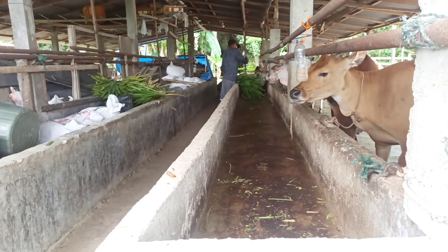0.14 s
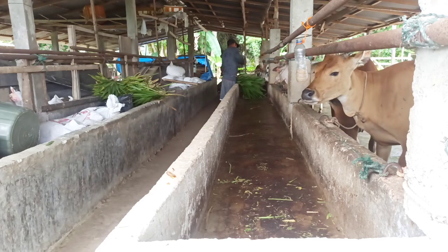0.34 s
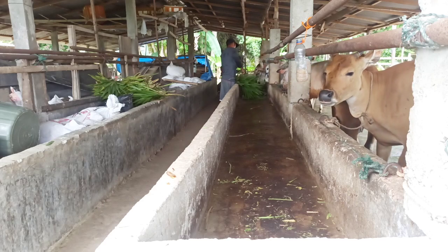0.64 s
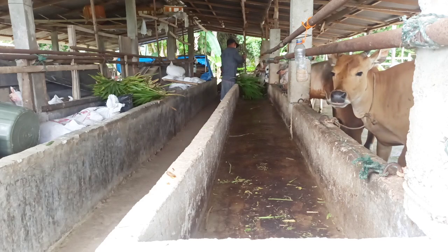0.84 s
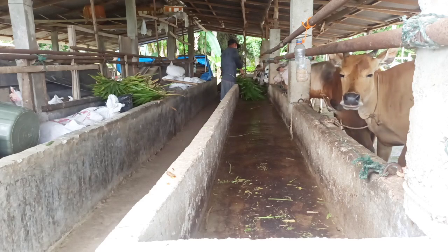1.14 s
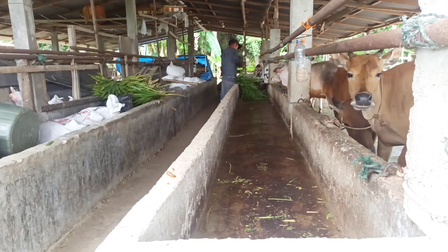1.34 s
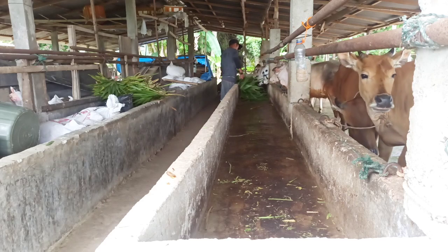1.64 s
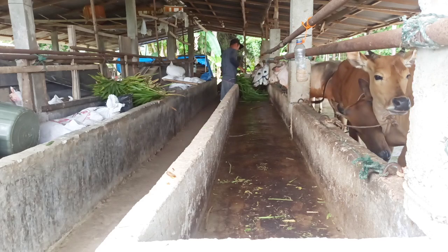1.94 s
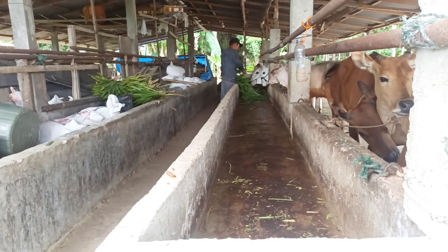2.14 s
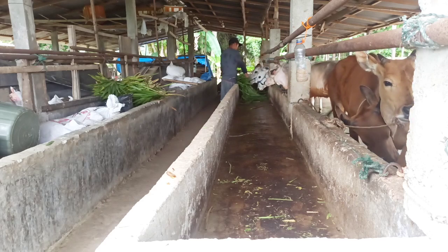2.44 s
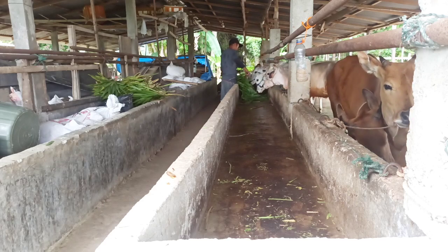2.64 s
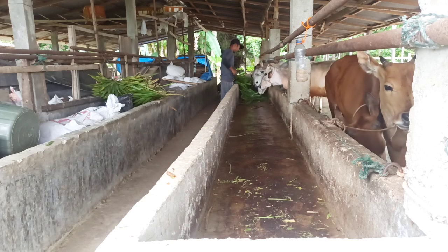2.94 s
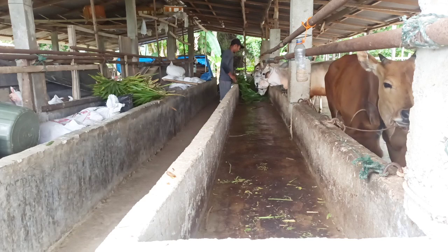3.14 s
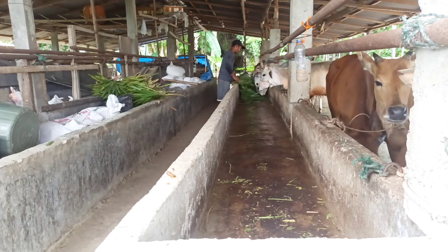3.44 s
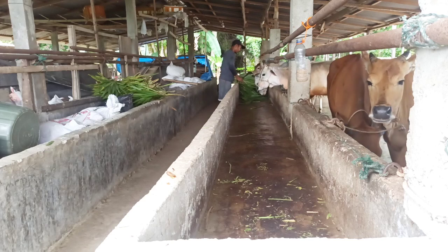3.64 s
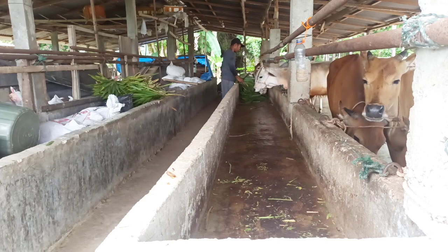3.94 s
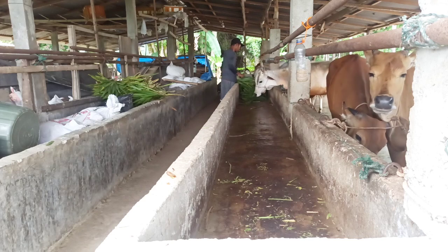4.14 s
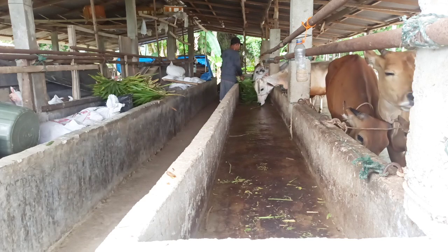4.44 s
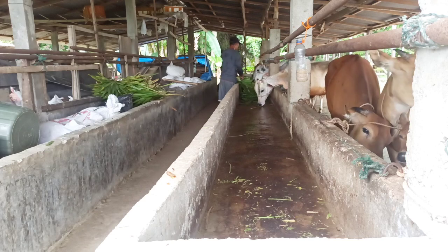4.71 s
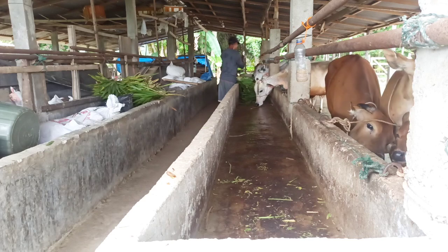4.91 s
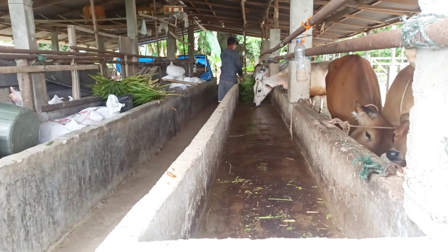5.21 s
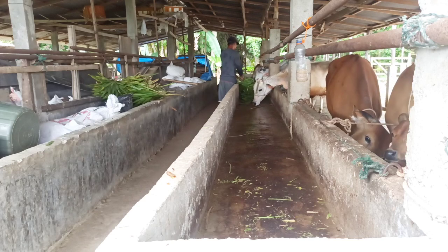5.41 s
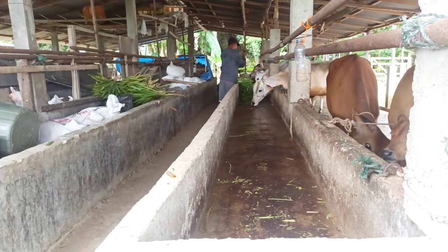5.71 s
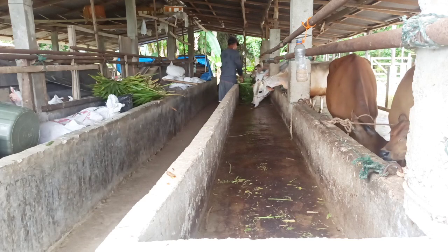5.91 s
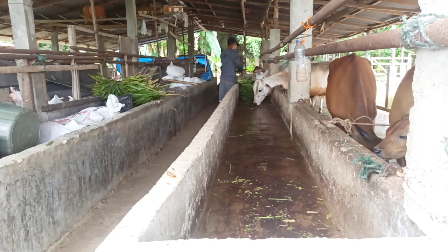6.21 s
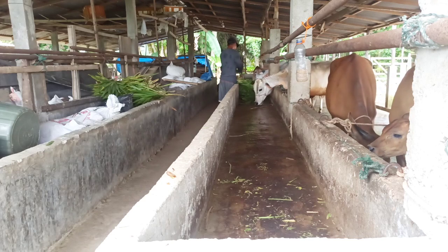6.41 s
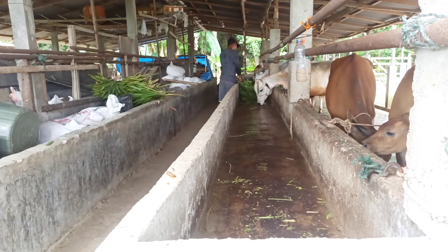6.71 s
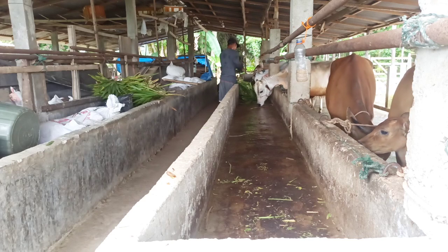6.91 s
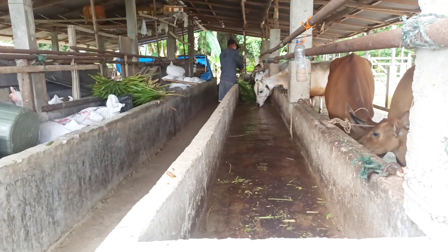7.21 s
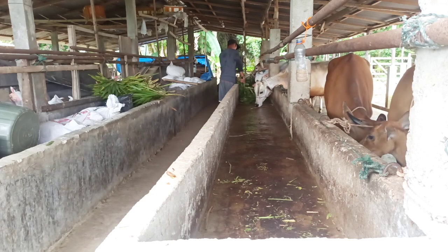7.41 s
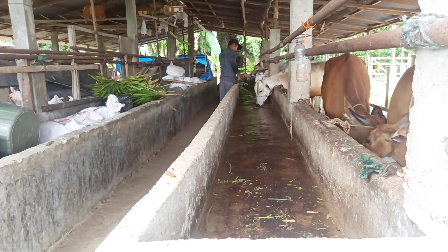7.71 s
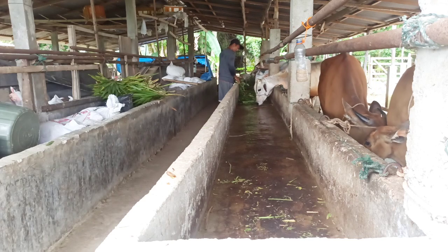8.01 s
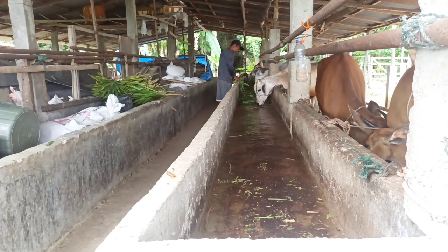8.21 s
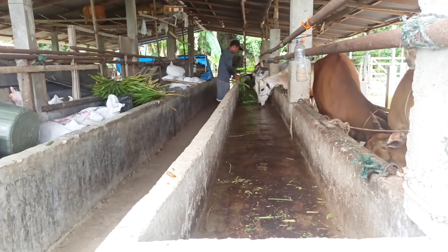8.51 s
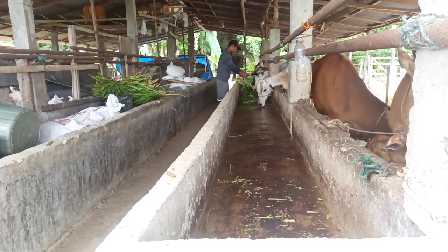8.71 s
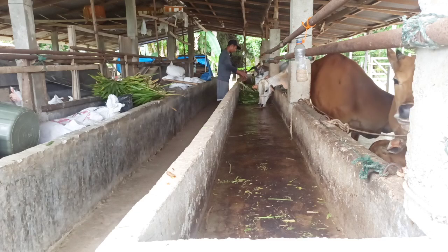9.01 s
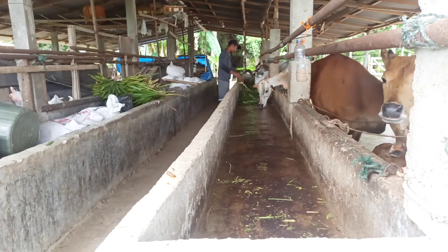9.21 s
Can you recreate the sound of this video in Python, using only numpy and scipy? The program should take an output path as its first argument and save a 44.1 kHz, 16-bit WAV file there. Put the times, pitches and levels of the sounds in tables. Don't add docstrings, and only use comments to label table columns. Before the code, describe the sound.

Eight blade blows chop fodder stalks on a wooden block under a tin barn roof, with rustling leaves, cicadas, bird whistles and distant engine thud.

```python
import sys
import numpy as np
from scipy import signal
from scipy.fft import rfft, irfft, next_fast_len
from scipy.io import wavfile
from scipy.ndimage import uniform_filter1d, map_coordinates

SR = 44100
rng = np.random.default_rng(int(sys.argv[2]) if len(sys.argv) > 2 else 0)


def pcm_store(signal):
    levels = np.round(np.clip(np.atleast_2d(signal), -1, 1) * 32767)
    wavfile.write(sys.argv[1], SR, levels.astype(np.int16).T)


def magnitude_from_level(level_db):
    exponent = np.asarray(level_db, float) / 20
    return 10 ** exponent


N = 412335


def unit(x):
    return x / np.sqrt(np.mean(x ** 2) + 1e-20)


def along(points, hz):
    f, v = np.transpose(points)
    return np.interp(np.log(hz + 1), np.log(f + 1), v)


def curves(rows):
    s, *cols = np.transpose(rows)
    return [np.interp(np.arange(N) / SR, s, c) for c in cols]


def wobble(rate):
    at = np.arange(0, N + 64, 64)
    knots = rng.standard_normal(int(N * 40 / SR))
    return np.interp(np.arange(N), at, map_coordinates(knots, [at * rate / SR]))


def filtered(x, response):
    m = next_fast_len(x.shape[-1] + 8192)
    shaped = rfft(x, m) * response(np.fft.rfftfreq(m, 1 / SR))
    return irfft(shaped, m)[..., :x.shape[-1]]


def modes(table):
    def response(f):
        total = 0
        for k, (centre, width, db) in enumerate(table):
            damping = 1j * f * width
            total = total + (-1) ** k * magnitude_from_level(db) * damping / (centre ** 2 - f ** 2 + damping)
        return total
    return response


def add(out, s, x):
    part = out[:, round(s * SR):][:, :x.shape[1]]
    part += x[:, :part.shape[1]]


# frequency [Hz], left-right likeness [-1 to 1].
LIKENESS = [(40, .98), (125, .93), (300, .82), (700, .62), (1500, .3), (3000, .15), (6000, .08),
            (9000, -.15), (14000, -.05)]


def spread(pair):
    def mid_side(hz):
        turn = np.arccos(np.clip(along(LIKENESS, hz), -1, 1)) / 2
        return np.array([np.cos(turn), np.sin(turn)])
    mid, side = filtered(pair, mid_side)
    return np.array([mid + side, mid - side])


# frequency [Hz], time to fall 60 dB [s].
ROOF_RING = [(200, 0.62), (800, 0.45), (2000, 0.33), (6000, 0.39), (15000, 0.5)]


def roof(x, wet_db):
    hz, t, z = signal.stft(spread(rng.standard_normal((2, SR // 3))), SR, nperseg=256)
    fade = magnitude_from_level(-60 * t / along(ROOF_RING, hz)[:, None])
    tail = signal.istft(z * fade, SR, nperseg=256)[1]
    return magnitude_from_level(wet_db) * signal.fftconvolve(x[None], tail / np.linalg.norm(tail[0]), axes=1)


# start [s], thud level [dB], thud pitch [Hz], splinter level [dB], tearing length [s].
CHOPS = [
    (0.489, -13, 940, -14, 0.065),
    (1.096, -12.5, 605, -11, 0.066),
    (1.629, -17, 550, -10.5, 0.065),
    (2.426, -15, 263, -13.5, 0.12),
    (5.234, -12, 990, -12.5, 0.077),
    (5.919, -14.5, 420, -12, 0.084),
    (6.563, -15, 300, -11, 0.04),
    (7.324, -19, 500, -9.5, 0.036),
]
# frequency [Hz], level [dB].
BLOCK_COLOUR = [(100, -42), (200, -2), (500, -2.5), (1000, -1.5), (1500, -5.5), (3000, -17)]
# frequency [Hz], level [dB].
STALK_COLOUR = [(300, -47), (1000, -7.5), (2100, -1.5), (3000, -6), (4300, -2), (7000, 1), (12000, -7.5),
                (16000, -8.5)]


def chops():
    out, t = np.zeros((2, N)), np.arange(SR // 6) / SR
    rise = 1 - np.exp(-t / .002)
    cut = rise / (1 + (t / .015) ** 6)
    for s, thud_db, thud_hz, splinter_db, length in CHOPS:
        lumps = magnitude_from_level(5.4 * unit(uniform_filter1d(rng.standard_normal(len(t)), size=130)))
        tear_fade = magnitude_from_level(-60 * t / 1.6) / (1 + (t / length) ** 4)
        tear = magnitude_from_level(-7) * rise * unit(lumps) * tear_fade
        snaps = rng.standard_normal((3, len(t))) * magnitude_from_level(3.7 * rng.standard_normal(len(t)))
        knock = modes([(thud_hz, .6 * thud_hz, 0)])
        wood = filtered(snaps[0], lambda hz: magnitude_from_level(along(BLOCK_COLOUR, hz)) * (1.0 + np.abs(knock(hz))))
        thud = magnitude_from_level(thud_db) * unit(wood)
        fibres = filtered(snaps[1:], lambda hz: magnitude_from_level(along(STALK_COLOUR, hz)))
        splinters = magnitude_from_level(splinter_db) * unit(spread(fibres))
        add(out, s, (cut + 0.77 * tear) * thud + (cut + tear) * splinters)
        add(out, s + .005, roof((cut + 0.77 * tear) * (0.4 * thud + splinters[0]), wet_db=3.0))
    return out


# start [s], peak level [dB], pitch [Hz].
TICKS = [(0.258, -29, 890), (1.565, -27.5, 1110), (3.625, -28, 1120), (4.259, -18, 2130),
         (4.287, -21, 1120), (4.322, -21, 1170), (4.507, -16.5, 1400), (4.58, -21, 1700),
         (4.635, -21, 1500), (4.26, -23, 1150), (6.138, -35, 840), (6.899, -22, 1130), (7.484, -16, 2600),
         (7.678, -24, 1600), (7.735, -17.5, 1970), (7.825, -15.5, 790), (7.836, -12.5, 2370),
         (8.035, -33, 885), (8.363, -24, 900), (9.031, -16, 800), (9.079, -17.5, 1790)]
# start [s], peak level [dB], pitch [Hz].
HOOVES = [
    (2.774, -26, 330),
    (4.364, -25, 397),
    (5.245, -15, 110),
    (7.743, -18.5, 240),
    (9.053, -14, 221),
    (9.286, -19.5, 250),
]
# start [s], peak level [dB], pitch [Hz].
STRAWS = [
    (6.228, -20, 6600),
    (9.313, -14, 6200),
]


def ticks():
    out, t = np.zeros((2, N)), np.arange(SR // 20) / SR
    for s, db, hz in TICKS + HOOVES + STRAWS:
        puff = rng.standard_normal(len(t)) * magnitude_from_level(-60 * t / 0.047)
        snap = filtered(puff, modes([(hz, 0.55 * hz, 0)]))
        snap = magnitude_from_level(db + 1.0) * snap / np.abs(snap).max()
        add(out, s, np.array([snap, snap]))
        add(out, s + .005, roof(snap, wet_db=0.5))
    return out


def rush(spectrum, patchy_db):
    z = signal.stft(rng.standard_normal((2, N)), nperseg=512)[2]
    field = uniform_filter1d(rng.standard_normal(z.shape[1:]), size=6, axis=0)
    field = uniform_filter1d(field, size=12, axis=1)
    pair = signal.istft(z * magnitude_from_level(patchy_db * unit(field)), nperseg=512)[1][:, :N]
    return unit(spread(filtered(pair, lambda hz: magnitude_from_level(along(spectrum, hz)))))


def swells(at, peak_db, rise, fall, floor_db):
    t = np.arange(0, N + 64, 64)[:, None] / SR - at
    shape_db = peak_db - 10 * np.maximum(-t / np.abs(rise), t / np.abs(fall))
    power = np.sum(magnitude_from_level(2 * shape_db), axis=1) + magnitude_from_level(2 * floor_db)
    return np.interp(np.arange(N), np.arange(len(t)) * 64, np.sqrt(power))


# peak time [s], peak level [dB], rise [s], fall [s], brightness [dB].
RUSTLES = [(0.0, -32, .1, 0.5, -11), (.52, -26.5, 0.067, 0.13, -11), (.7, -33.5, .1, 0.68, -11.5),
           (1.28, -33, 0.28, 0.32, -8.5), (1.48, -32.5, 0.24, 0.2, -25), (1.9, -31.5, 0.25, 0.23, -6),
           (2.14, -40.5, 0.23, 0.17, -21), (2.44, -27.5, 0.076, .2, -22), (2.6, -31.5, 0.13, 0.77, -12.5),
           (3.13, -36.5, 0.038, 0.41, -3.5), (3.49, -34.5, 0.18, 0.26, -5.5), (3.7, -27, 0.22, 0.37, -11.5),
           (4.05, -36.5, .3, .7, -7.5), (4.51, -27.5, 0.036, 0.1, -9.5), (4.75, -36, 0.72, 0.73, -12.5),
           (5.75, -32, 0.18, 0.24, -13.5), (6.08, -33.5, 0.084, 0.29, -11.5),
           (6.23, -34.5, 0.024, 0.079, -1), (6.77, -36, 1, 0.98, -15.5), (7.5, -30.5, 0.23, 0.5, -11.5),
           (7.86, -34, 0.28, 0.074, -7.5), (8.2, -36.5, .12, 0.38, -6.5), (8.56, -32.5, 0.41, 0.54, -12),
           (9.08, -27.5, 0.26, 0.19, -12.5)]
# frequency [Hz], level [dB].
LEAF_COLOUR = [(100, -34), (300, -8), (700, -1), (1200, -2.5), (2200, -4), (3500, -4), (6000, -3),
               (16000, -17.5)]
# frequency [Hz], level [dB].
AIR_COLOUR = [(6000, -49), (9000, 11), (12000, 0), (16000, -0.5)]


def rustles():
    at, peak_db, rise, fall, bright_db = np.transpose(RUSTLES)
    body = swells(at, peak_db, rise, fall, floor_db=-42)
    leaves = body * magnitude_from_level(3.5 + 0.87 * wobble(12)) * rush(LEAF_COLOUR, patchy_db=2.0)
    top = swells(at, peak_db + bright_db, rise, fall, floor_db=-63)
    return leaves + top * magnitude_from_level(13) * rush(AIR_COLOUR, patchy_db=.5)


# time [s], level [dB].
BREEZE = [(0, -49), (2.0, -45), (2.3, -60), (3.0, -42.5), (4.4, -49), (5.5, -35.5), (6.3, -44), (6.5, -34),
          (7.3, -35), (8.05, -41.5), (8.3, -39), (9.35, -34.5)]
# frequency [Hz], level [dB].
HISS_COLOUR = [(1000, -58), (3000, -12), (5000, 2), (7000, 1), (9000, -4), (12000, -13), (16000, -13)]


def hiss():
    at, peak_db, rise, fall, bright_db = np.transpose(RUSTLES)
    crisp = swells(at, peak_db + 5.5 + 0.58 * bright_db, rise, fall, floor_db=-70)
    level = np.hypot(crisp, magnitude_from_level(curves(BREEZE)[0]))
    return level * magnitude_from_level(6 + 0.6 * wobble(10)) * rush(HISS_COLOUR, patchy_db=2.5)


def duck():
    t, delay, back = np.arange(N) / SR, 0.064, 0.11
    dips = 0
    for s, *_ in CHOPS:
        late = t - s - delay
        dips = dips + np.exp(-(late / np.where(late < 0, delay / 2, back)) ** 2)
    return magnitude_from_level(-5.5 * dips)


# time [s], firings per second.
SPEED = [(0.0, 18.87), (0.6, 17.17), (1.2, 16.6), (1.8, 20.18), (2.6, 19.45), (3.2, 18.07), (3.8, 18.37),
         (5.2, 23.15), (5.4, 22.1), (5.8, 24.3), (6.4, 20.32), (7.2, 22.09), (8.0, 22.5), (8.4, 21.43),
         (9.35, 21.32)]
# time [s], level [dB].
EXHAUST = [(.4, -30), (.7, -44), (.83, -26), (.96, -36), (1.25, -30.5), (1.5, -25), (2.73, -20),
           (2.89, -31.5), (3.04, -35), (3.1, -23), (4.97, -25.5), (5.08, -35.5), (5.5, -25.5), (7.3, -21),
           (7.42, -32.5), (7.94, -17.5), (8.88, -23.5), (8.98, -35)]
# time [s], frequency [Hz].
BOOM = [(0, 133), (1.3, 143), (1.8, 160), (2.2, 162), (2.8, 154), (3.3, 145.3), (4.5, 142), (5.5, 138.4),
        (6.3, 137), (7, 133), (7.8, 153), (8.4, 136), (9.35, 124)]
# frequency [Hz], level [dB].
ROAR_COLOUR = [(20, -32), (45, -18.5), (60, -2.5), (100, -1), (200, -3), (300, -11.5), (450, -14),
               (900, -31.5), (2000, -75)]


def engine():
    turns = -.55 + np.cumsum(curves(SPEED)[0]) / SR + 0.0059 * wobble(12)
    rate = np.gradient(turns) * SR
    level_db = curves(EXHAUST)[0] + 1.44 * wobble(5)
    boom_hz = curves(BOOM)[0]
    thuds = 0
    for k in range(3, 14):
        off = (k * rate - boom_hz) / 25
        fall_db = np.minimum(8 * off ** 2, 16 + np.abs(off)) + 2.2 * wobble(3)
        lag = .45 * off ** 2 + .3 * wobble(3) + .13 * wobble(14)
        thuds = thuds + magnitude_from_level(-fall_db) * np.cos(2 * np.pi * k * turns + lag)
    thuds *= magnitude_from_level(.9 * wobble(20)) / np.sqrt(np.abs(uniform_filter1d(thuds ** 2, size=SR // 3)) + 1e-9)
    thuds = thuds + 0.17 * np.roll(thuds, SR // 30) * [[1], [-1]]
    roar = magnitude_from_level(-30.5 + 1.6 * wobble(5)) * rush(ROAR_COLOUR, patchy_db=1.5)
    return magnitude_from_level(level_db - 2.0) * duck() * thuds + roar


def whistle(out, s, at, hz, level_db):
    t = np.arange(at[0], at[-1], 1 / SR)
    husk = uniform_filter1d(rng.standard_normal(len(t)), size=60)
    phase = np.cumsum(2 * np.pi * np.interp(t, at, hz) / SR) + 2.7 * husk
    tone = magnitude_from_level(np.interp(t, at, level_db)) * signal.windows.tukey(len(t), .3) * np.sin(phase)
    add(out, s + at[0], tone * magnitude_from_level([[.8], [-.8]]))
    add(out, s + at[0] + .006, roof(tone, wet_db=-6))


# time from the phrase start [s], pitch [Hz], level [dB].
PHRASE = [
    [(0, 3300, -12), (.008, 2900, -9), (.02, 2350, -13)],
    [(.05, 3100, -10), (.066, 3400, -14), (.076, 3050, -5), (.085, 3180, -4), (.095, 3150, -5),
     (.1, 2980, 0), (.113, 2950, 0), (.12, 2650, -7), (.13, 2350, -14)],
    [(.155, 2600, -12), (.162, 2950, -2), (.18, 2970, -2), (.19, 2600, -7), (.205, 2200, -8)],
]
# start [s], level [dB], pitch factor.
SONGS = [
    (4.85, -22.5, 1.0),
    (5.232, -28.5, 1.05),
    (8.75, -26.5, 1.015),
    (0.97, -40, 0.84),
]
# start [s], level [dB], pitch [Hz].
CHEEPS = [
    (2.055, -34.5, 3010),
    (2.192, -32, 3780),
    (2.204, -36, 4280),
    (2.3, -32, 3500),
    (2.325, -34, 4350),
    (2.357, -33, 2910),
    (2.87, -37, 2930),
    (2.9, -39, 2640),
]


def bird():
    out = np.zeros((2, N))
    for s, db, factor in SONGS:
        for at, hz, level_db in map(np.transpose, PHRASE):
            whistle(out, s, at, factor * hz, db + level_db)
    for s, db, hz in CHEEPS:
        whistle(out, s, [0, .022], [1.04 * hz, .99 * hz], [db, db + 1])
    return out


def pulses(rate, scatter_db):
    fired = np.diff(np.floor(np.cumsum(rate) / SR), prepend=0) > 0
    return fired * magnitude_from_level(scatter_db * rng.standard_normal(N))


# peak time [s], peak level [dB], rise over 10 dB [s], fall over 10 dB [s].
CICADA_SWELLS = [(.32, -32, 0.24, .2), (.86, -27.5, 0.13, .22), (1.62, -38, 0.23, 0.18),
                 (2.3, -32, 0.18, 0.4), (3.0, -37.5, .4, .3), (3.28, -26, 0.2, 0.15),
                 (3.62, -31.5, 0.16, 0.18), (3.8, -30, 0.13, .12), (4.25, -26.5, 0.042, 0.26),
                 (4.4, -27, .2, 0.099), (4.8, -30, .3, 0.54), (5.2, -30.5, 0.15, 0.25), (5.57, -32, .3, .3),
                 (5.88, -30.5, .2, 0.35), (6.4, -39, 0.46, 0.65), (7.2, -33.5, 0.65, 0.18),
                 (7.76, -29.5, 0.047, 0.16), (8.12, -30, 0.087, .35), (8.52, -30, .14, 0.21),
                 (8.9, -30.5, 0.28, 0.066), (9.1, -30, .06, .1)]
# frequency [Hz], width [Hz], level [dB].
SHELL = [(4250, 550, -3.5), (4580, 330, 0)]


def cicadas():
    clicks = np.array([pulses(rate * (1 + .1 * wobble(25)), scatter_db=4) for rate in (178, 226)])
    chorus = unit(clicks) * magnitude_from_level(3 * wobble(14)) + .8 * rng.standard_normal((2, N))

    def shell(factor):
        low, high = modes(SHELL[:1]), modes(SHELL[1:])
        return filtered(chorus, lambda hz: np.abs(low(hz / factor)) ** 2 + np.abs(high(hz / factor)) ** 2)
    late = np.arange(N) / N
    buzz = (1 - late) * shell(1.025) + late * shell(.985)
    return swells(*np.transpose(CICADA_SWELLS), floor_db=-67) * unit(spread(buzz))


def scene():
    return chops() + ticks() + rustles() + hiss() + engine() + bird() + cicadas()


def flicker(x):
    hz, t, z = signal.stft(x, SR, nperseg=1024)
    band = (hz > 8600) & (hz < 11480)
    loud = np.log(np.mean(np.abs(z[:, band]) ** 2, axis=(0, 1)) + 1e-20)
    chance = unit(uniform_filter1d(rng.standard_normal(z.shape[1:]), size=7, axis=0))
    busy = unit(uniform_filter1d(rng.standard_normal(len(t)), size=3))
    odds = chance + .7 * busy + .45 * (loud - np.median(loud)) - (hz[:, None] - 8600) / 3000
    kept = np.where(band[:, None], odds > 1.05, 1)
    holes = (hz[:, None] > 11480) & (chance < -1.5)
    return signal.istft(z * kept * ~holes, SR, nperseg=1024)[1][:, :N]


def roll_off(x):
    return signal.sosfilt(signal.butter(12, 15990, fs=SR, output="sos"), x)


# upper edge [Hz], level [dB].
BAND_STEPS = [(4800, 2.5), (6100, -5), (6900, 1), (7600, 1), (8550, -2.5), (9000, -10), (9600, -16.5),
              (10400, -18.5), (11500, -33.5), (12800, -6), (15850, -5), (22100, -72)]
# frequency [Hz], left over right [dB].
LEAN = [(60, -1.4), (200, 1.5), (400, -0.5), (700, 1.2), (1300, 0), (2400, -1.1), (4400, -0.2), (8100, 3.5),
        (15000, -3)]


def record(dry):
    edges, steps_db = np.transpose(BAND_STEPS)

    def steps(hz):
        return magnitude_from_level(steps_db[np.minimum(np.searchsorted(edges, hz), len(edges) - 1)])

    def ports(hz):
        delay = np.exp(-2j * np.pi * hz * 1.72 / SR)
        return (magnitude_from_level(along(LEAN, hz)) * delay) ** np.array([[.5], [-.5]])
    x = flicker(filtered(dry, lambda hz: steps(hz) * ports(hz)))
    x = x / (1 + np.abs(x / 1.05) ** 6) ** (1 / 6)
    return roll_off(x)


dry = scene()
out = record(dry)
pcm_store(out)
```